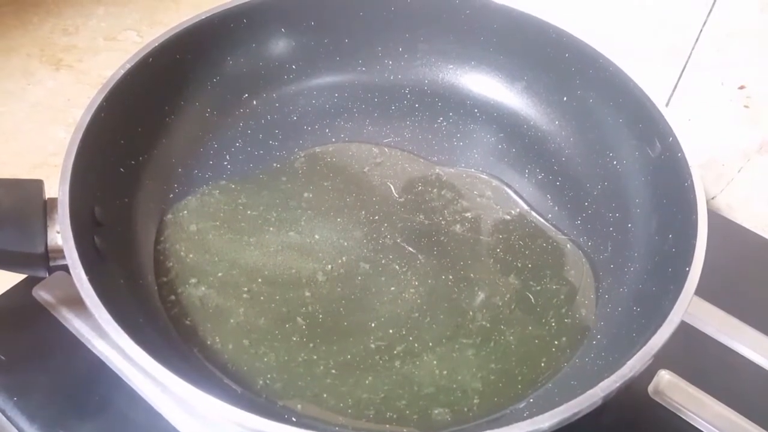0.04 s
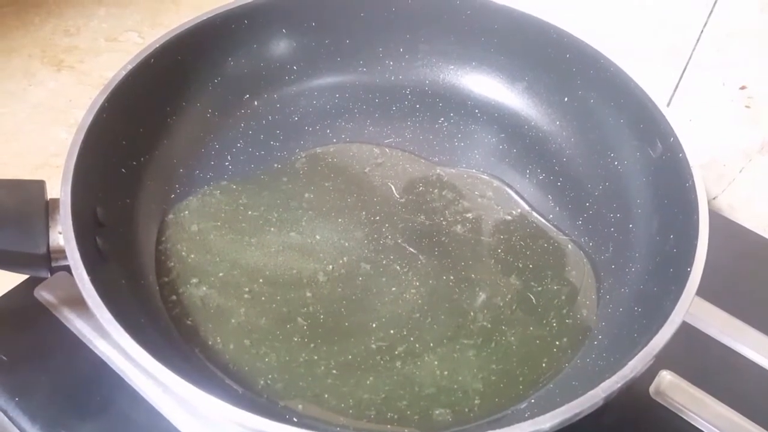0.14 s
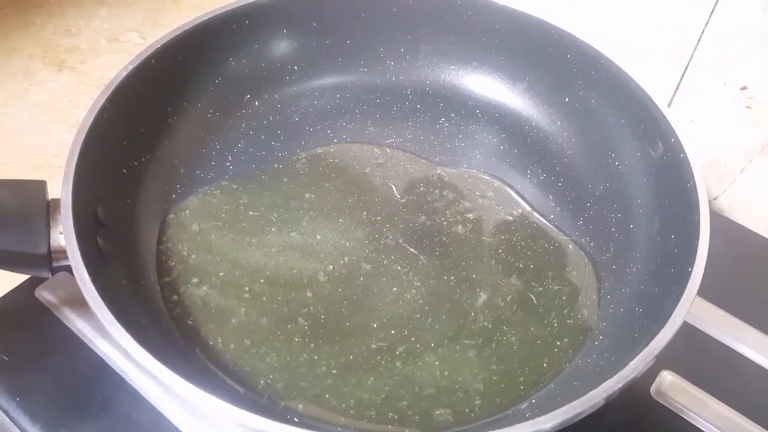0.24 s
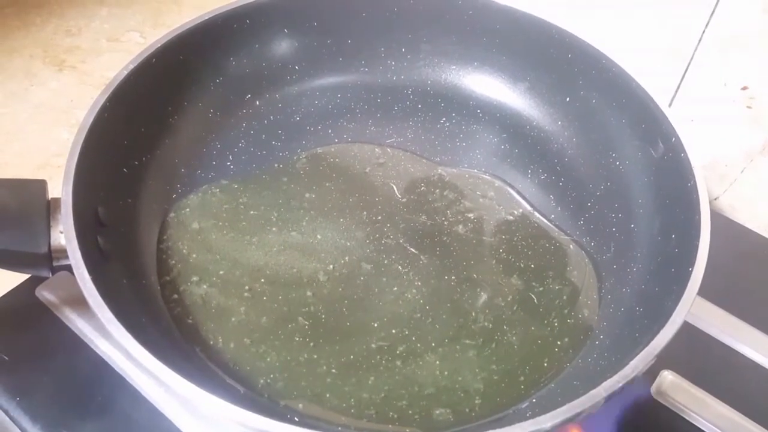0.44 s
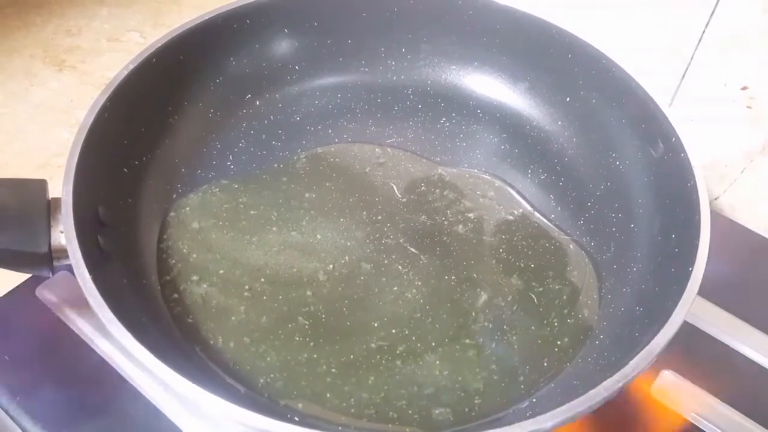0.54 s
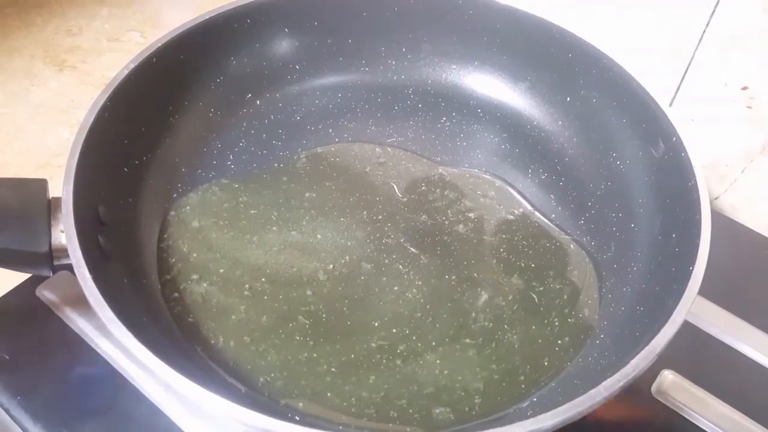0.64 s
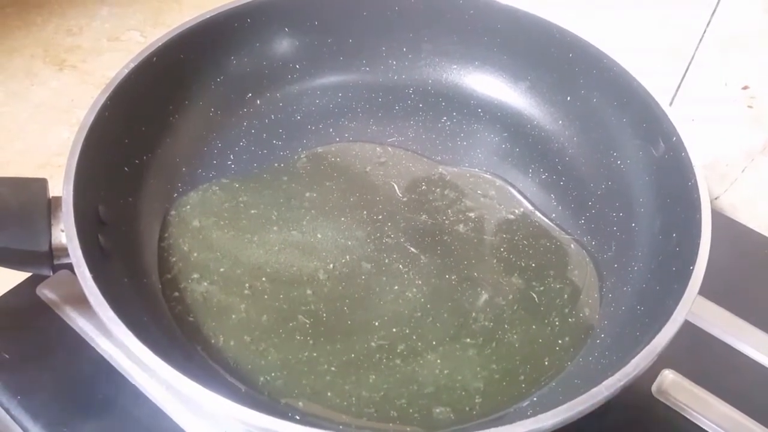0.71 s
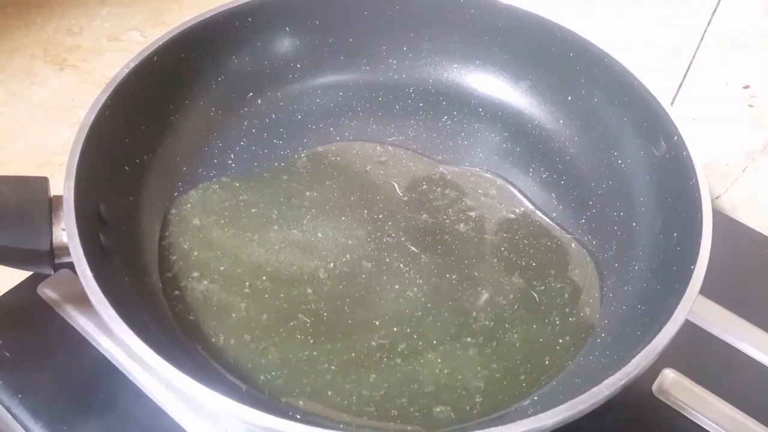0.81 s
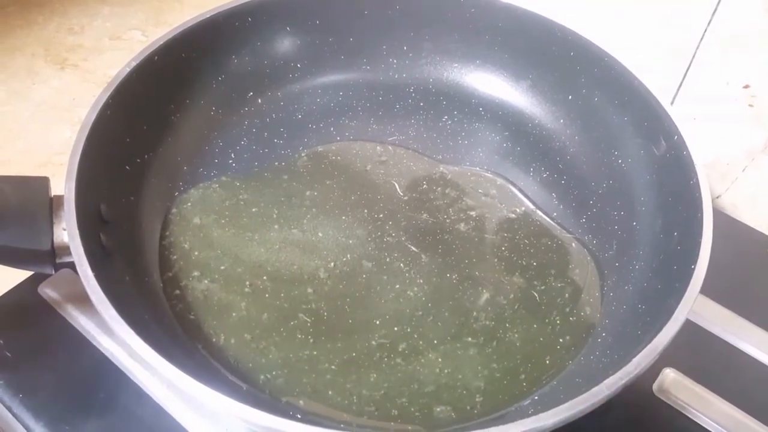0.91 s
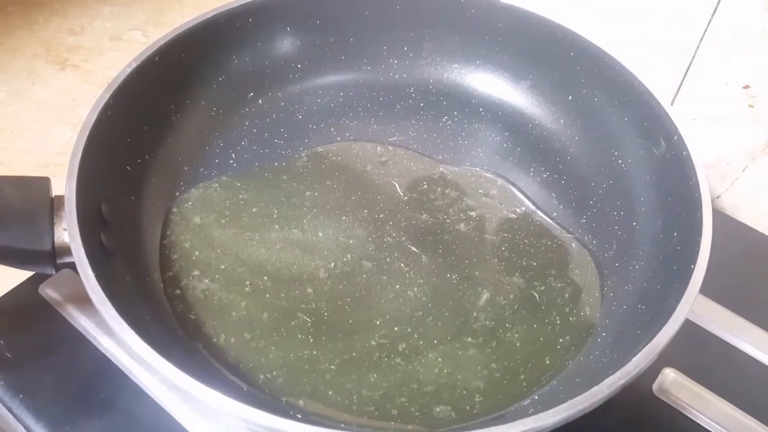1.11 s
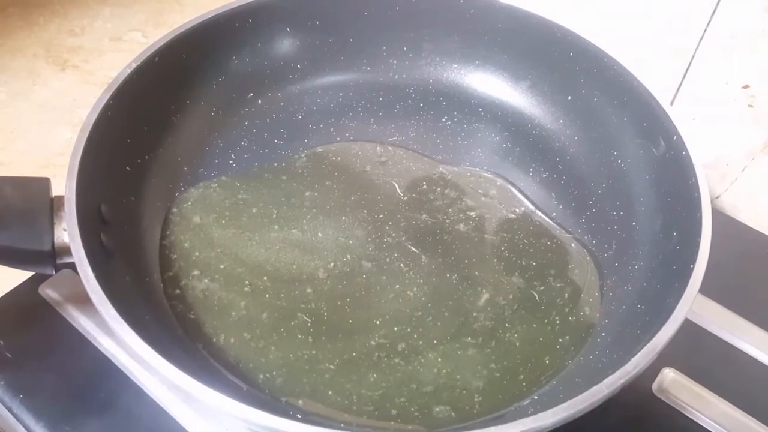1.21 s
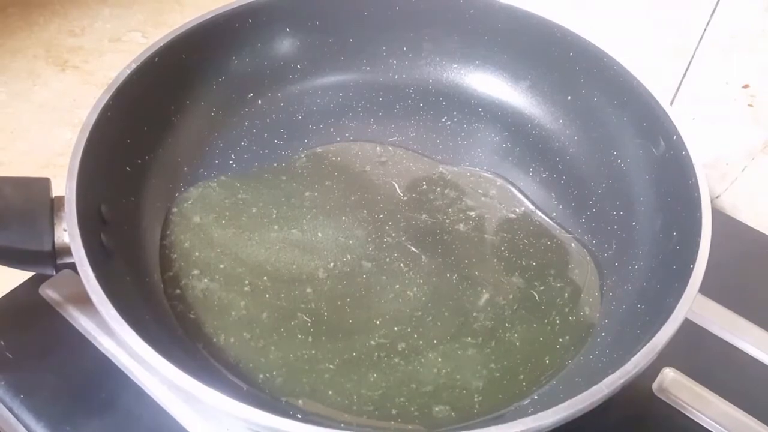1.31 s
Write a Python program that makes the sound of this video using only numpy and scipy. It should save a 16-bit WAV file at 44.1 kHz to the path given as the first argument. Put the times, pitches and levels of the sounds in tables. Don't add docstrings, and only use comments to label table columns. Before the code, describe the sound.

One loud metallic igniter click on a gas hob, followed by low fluttering whumps of flame.

```python
import sys
import numpy as np
from scipy import signal
from scipy.io import wavfile
from scipy.ndimage import uniform_filter1d

SR = 44100
rng = np.random.default_rng(int(sys.argv[2]) if len(sys.argv) > 2 else 0)


def transcribe(u):
    v = np.clip(np.atleast_2d(u).T, -1, 1)
    q = np.round(v * 32767).astype(np.int16)
    wavfile.write(sys.argv[1], SR, q)


def invert_db(level):
    return 10 ** (np.asarray(level, dtype=float) / 20)


N = 59535
TIME = np.arange(N) / SR
SNAP_S = 0.521
EARS = np.array([[1], [-1]])


def evened(x):
    return x / np.sqrt(np.mean(x ** 2) + 1e-20)


def read(points, hz):
    f, value = np.transpose(points)
    return np.interp(np.log(hz + 1), np.log(f + 1), value)


def curve(points):
    s, db = np.transpose(points)
    return invert_db(np.interp(TIME, s, db, left=db[0], right=db[-1]))


def resonate(x, hz, width):
    turn = np.exp(2j * np.pi * hz * np.arange(x.shape[-1]) / SR)
    r = np.exp(-np.pi * width / SR)
    low = signal.lfilter([1 - r], [1, -r], x / turn)
    low = signal.lfilter([1 - r], [1, -r], low)
    return 2 * (turn * low).real


def noise(colour, extra_db=lambda hz, t: 0, patchy_db=0.):
    # pitch in Hz, likeness of left and right (1 is equal, below 0 is opposed).
    likeness = [(60, 1), (180, 0.75), (540, 0.53), (1610, -0.22), (4810, 0.088), (14400, -0.34)]
    frames = N // 128 + 5
    hz = np.fft.rfftfreq(512, 1 / SR)[:, None]
    a, b, c, d, patches = rng.standard_normal((frames, 257, 5)).T
    patches = uniform_filter1d(patches, size=6, axis=0)
    patches = evened(uniform_filter1d(patches, size=24, axis=1))
    same = np.clip(read(likeness, hz), -1, 1)
    left = a + 1j * b
    right = same * left + np.sqrt(1 - same ** 2) * (c + 1j * d)
    z = np.array([left, right]) * invert_db(read(colour, hz) + patchy_db * patches)
    scale = np.sqrt(np.mean(signal.istft(z, nperseg=512, noverlap=384)[1] ** 2))
    z = z * invert_db(extra_db(hz, np.arange(frames) * 128 / SR))
    return signal.istft(z, nperseg=512, noverlap=384)[1][:, :N] / scale


def kitchen():
    # pitch in Hz, level in dB per Hz.
    rumble_colour = [(20, -22), (50, 6.5), (100, 3), (300, -6.5), (420, -9.5), (560, -22.5), (1200, -22.5),
                     (2000, -48)]
    # pitch in Hz, level in dB per Hz.
    air_colour = [(200, -24), (500, -1.5), (1100, -6), (2000, -7), (4300, -11.5), (7000, -10.5),
                  (8400, -19.5), (9100, -32.5)]
    # pitch in Hz, width in Hz, level in dB.
    duct = [(960, 85, -63.5), (1830, 140, -67.5), (2184, 74, -68), (2685, 51, -69), (1247, 58, -72.5),
            (9390, 440, -75.5)]
    # pitch in Hz, width in Hz, level in dB.
    jet_tones = [(6090, 670, -50.5), (11580, 430, -69), (3235, 93, -63), (10630, 240, -72.5)]
    # time in seconds, level in dB.
    jet_level = [(0, 0.5), (.25, 0.5), (.515, 0), (.53, -15), (.82, -2.5), (.86, -7), (.91, -2.5), (1.0, -6),
                 (1.1, -5.5), (1.16, -1), (1.35, -1)]
    # time in seconds, gain in dB.
    camera_gain = [
        (0, 8),
        (.15, 4.5),
        (.27, 7.5),
        (.515, 7.5),
        (.53, 13),
        (.85, 0.5),
        (1.05, -2),
        (1.17, 0.5),
        (1.35, 2),
    ]
    rumble_db, air_db, swell_db, patchy_db = -39.5, -52, 1., .7
    rumble_follows = .3
    swell = uniform_filter1d(rng.standard_normal(N), size=2000)
    swell = evened(uniform_filter1d(swell, size=2000))
    white = rng.standard_normal((2, N))
    gain = curve(camera_gain)
    hiss = sum(invert_db(db) * evened(resonate(white, hz, width)) for hz, width, db in jet_tones)
    hiss = hiss * invert_db(swell_db * (swell - swell.mean()))
    air = invert_db(air_db) * noise(air_colour, patchy_db=patchy_db)
    air = air + sum(invert_db(db) * evened(resonate(white, hz, width)) for hz, width, db in duct)
    rumble = invert_db(rumble_db) * noise(rumble_colour)
    return gain ** rumble_follows * rumble + gain * air + curve(jet_level) * hiss


def flame():
    # centre in seconds, length in seconds, level in dB, pitch in Hz.
    puffs = [(.245, 0.098, -27.5, 57), (0.27, 0.071, -27.5, 106.2), (0.45, 0.045, -33, 130),
             (.365, 0.034, -30.5, 65), (0.431, 0.036, -22, 126), (.47, 0.091, -32, 282),
             (0.488, 0.054, -26, 95), (.607, 0.029, -13, 92), (0.671, 0.035, -18.5, 83),
             (.615, 0.04, -24, 215), (.636, 0.04, -23.5, 100), (0.721, 0.045, -27, 99),
             (.699, 0.04, -22, 99), (.741, 0.032, -26, 99), (.688, 0.019, -21.5, 100),
             (0.108, 0.066, -38, 57), (0.365, 0.044, -32, 133), (.29, 0.043, -41, 400),
             (.4, 0.052, -41.5, 420), (.78, 0.056, -39.5, 307), (.88, 0.035, -40, 170),
             (1.2, 0.071, -35.5, 94.4), (.69, 0.032, -30.5, 322), (.61, 0.026, -24.5, 50),
             (.598, 0.0124, -21.5, 140), (.55, .05, -29, 70), (0.99, 0.048, -37, 110),
             (1.08, 0.072, -41, 230), (0.85, .05, -40, 210), (.21, 0.051, -41, 400),
             (0.466, 0.061, -43, 544), (.59, 0.065, -28, 365), (.64, 0.042, -31, 340),
             (0.348, 0.032, -28.5, 153.6), (0.35, 0.055, -40.5, 273), (.7, 0.027, -32, 228),
             (1, 0.037, -41, 99), (.98, 0.091, -38.5, 186), (1.18, 0.053, -44.5, 303),
             (0.8, 0.091, -40, 110), (0.58, .04, -32, 88), (0.0103, 0.034, -29, 67),
             (0.12, 0.078, -36, 109), (1.3, 0.15, -40, 300), (1.28, 0.096, -39.5, 205)]
    # pitch in Hz, width in Hz, level in dB.
    roar_lumps = [(63.3, 20, -2), (98.9, 25, 2.5), (169.1, 35, -4), (284.3, 30.4, -4.5), (387.5, 27, -9)]
    # time in seconds, level of the roar in dB.
    roar_strength = [
        (0, -41),
        (.15, -42),
        (.3, -37),
        (.5, -31),
        (.53, -40),
        (.58, -24.5),
        (.74, -35.5),
        (.8, -44.5),
        (1.35, -41),
    ]
    ear_lag_s = 0.00011
    spread_per_hz = 0.0006
    out = np.zeros((2, N))
    for s, length, db, hz in puffs:
        swing = np.cos(2 * np.pi * hz * (TIME - s + ear_lag_s * EARS))
        out += invert_db(db) * np.exp(-(2 * (TIME - s) / length) ** 2) * swing
    shared, differing = rng.standard_normal((2, N))
    roar = 0
    for hz, width, db in roar_lumps:
        source = shared + spread_per_hz * hz * EARS * differing
        roar = roar + invert_db(db) * evened(resonate(source, hz, width))
    return out + curve(roar_strength) * evened(roar)


def ringing():
    # time in seconds, level in dB.
    strength = [
        (.5165, -35),
        (.5198, -19.5),
        (.521, -19.5),
        (.532, -24.5),
        (.538, -19.5),
        (.595, -23),
        (.62, -30),
        (.705, -37.5),
        (.755, -50.5),
    ]
    # pitch in Hz, level in dB per Hz.
    tail_colour = [(240, -13), (400, -4.5), (1040, -5), (2700, -7), (7400, -9), (9800, -30), (11500, -20),
                   (14600, -33.5)]
    # pitch in Hz, level in dB, time to fade by 20 dB in seconds.
    metal_tones = [(617, -0.5, .4), (737, -7.5, 0.18), (880, -5.5, .26), (1031, -3, 0.26),
                   (1297, -4.5, 0.14), (1400, -4, 0.091), (1822, -5, .6), (2012, -0.5, 0.4),
                   (2280, 2.5, 0.62), (2737, 4, 0.17), (3877, 0, 0.18), (4836, 1.5, .5), (5195, 3.5, 0.33),
                   (7014, 2.5, 0.4)]
    top_hz, top_fade_db_per_s, right_top_db = 9200, -81, 16
    metal_width_hz, metal_db = 22, -4
    end_db_per_s, patchy_db = -220, 2.4

    def top_change(hz, t):
        pan_db = right_top_db * np.array([-.5, .5])[:, None, None]
        return (hz > top_hz) * (top_fade_db_per_s * (t - SNAP_S).clip(0) + pan_db)

    white = rng.standard_normal((2, N))
    age = (TIME - SNAP_S).clip(0)
    metal = 0
    for hz, db, t60 in metal_tones:
        metal = metal + invert_db(db - 20 * age / t60) * resonate(white, hz, metal_width_hz)
    metal = metal / np.sqrt(np.mean(metal[:, :N // 3] ** 2))
    tail = noise(tail_colour, top_change, patchy_db) + invert_db(metal_db) * metal
    started = TIME > strength[0][0]
    ending = invert_db(end_db_per_s * (TIME - strength[-1][0]).clip(0))
    return started * curve(strength) * ending * tail


def igniter():
    # start in seconds, level in dB, left over right in dB, pitch in Hz,
    # time to fade by 60 dB in seconds.
    blows = [(0.5201, -1, 14, 5650, 0.0054), (.5203, -5, -11, 3050, 0.0048),
             (0.5212, -9.5, -19, 7090, 0.0078), (.5219, -18, 2, 2070, 0.0036),
             (.5220, -14, 4, 5860, 0.0049), (0.524, -7, -15, 7270, 0.0094), (.5235, -14, -4, 4860, 0.0076),
             (0.5248, -7.5, 9, 5200, .007), (0.5239, -13, -8, 7000, 0.0064),
             (.5268, -9.5, 11, 1310, 0.0077), (0.5265, -7, -13, 4030, 0.0045), (0.5287, -14, -4, 5440, .01),
             (0.529, -10, -4, 6370, 0.0087), (.5306, -11, 10, 7400, 0.016),
             (.5312, -14.5, -9, 1510, 0.0036), (.5317, -7.5, -5, 4785, 0.019),
             (.5328, -11, 6, 5100, 0.0085), (.5372, -14.5, 7, 925, 0.013), (.5405, -8.5, 11, 1100, .012),
             (0.541, -11, -5, 1500, 0.0092)]
    # pitch in Hz, level in dB per Hz.
    snap_colour = [(400, -18), (750, -18), (1050, 1), (1500, -3), (2000, 5), (3500, -1), (7200, 4.5),
                   (9500, -18)]
    # pitch in Hz, width in Hz, level in dB.
    spring_whistle = (13050, 3000, -21)
    rise_s, blow_width_hz, ping_db = 0.00035, 4000, 7.5
    tick_db, tick_t60_s = -2.5, 0.015
    clamp_s, clamp_db = .534, -6
    out = np.zeros((2, N))
    whistle_hz, whistle_width, whistle_db = spring_whistle
    whistle = evened(resonate(rng.standard_normal((2, N)), whistle_hz, whistle_width))
    bright = noise(snap_colour) + invert_db(whistle_db) * whistle
    white = rng.standard_normal((2, N))
    for s, db, pan_db, hz, t60 in blows:
        age = np.maximum(TIME - s, 0)
        ping = invert_db(ping_db - 60 * age / t60) * np.sin(2 * np.pi * hz * age)
        grit = .5 * evened(resonate(white, hz, blow_width_hz)) + bright
        tick = invert_db(tick_db - 60 * age / tick_t60_s) * grit
        rise = 1 - np.exp(-age / rise_s)
        out += invert_db(db - 9 + pan_db * EARS / 2) * rise * (ping + tick)
    return out * invert_db(clamp_db * np.clip((TIME - clamp_s) * 1000, 0, 1))


def knock():
    # pitch in Hz, level in dB, time to fade by 60 dB in seconds.
    casing_tones = [(250.2, -9.5, 0.1), (585, -25, 0.13), (357.4, -26, 0.3), (890, -31.5, 0.078),
                    (1100, -26, 0.19), (2010, -25.5, 0.13), (733.6, -33.5, 0.54), (608, -32, 0.53),
                    (1023, -32.5, 0.54), (223, -22, 0.36), (1280, -30.5, 0.065)]
    rise_s = 0.0045
    age = (TIME - SNAP_S).clip(0)
    tones = sum(invert_db(db - 60 * age / t60) * np.sin(2 * np.pi * hz * age) for hz, db, t60 in casing_tones)
    return (1 - np.exp(-age / rise_s)) * tones


def scene():
    left_db, duck_db, duck_s = 0.5, -15, 0.029
    lean = invert_db(left_db * EARS / 2)
    t = TIME - SNAP_S
    onset = np.clip(t * 200 + 1, 0, 1)
    duck = invert_db(duck_db * onset * np.exp(-(t.clip(0) / duck_s) ** 2))
    return igniter() + lean * (ringing() + knock()) + duck * (flame() + kitchen())


def thinned_top(x):
    lowest_hz, limit_db, scatter_db = 8800, -15.5, 4
    floor_db = -68
    hz, _, z = signal.stft(x, SR, nperseg=1024, noverlap=768)
    power = uniform_filter1d(abs(z) ** 2, size=7, axis=1)
    power = uniform_filter1d(power, size=5, axis=2)
    treble = power[:, (hz > 2000) & (hz < 8000)].mean(axis=(0, 1))
    blocks = rng.standard_normal((1, 65, z.shape[2] // 6 + 1))
    blocks = np.repeat(np.repeat(blocks, 8, axis=1), 6, axis=2)[:, :513, :z.shape[2]]
    ratio = abs(power / np.maximum(treble, invert_db(2 * floor_db)))
    keep = np.clip(10 * np.log10(ratio + 1e-20) - limit_db - scatter_db * blocks, 0, 1)
    keep = np.maximum(keep, (hz < lowest_hz)[:, None])
    return signal.istft(z * keep, SR, nperseg=1024, noverlap=768)[1][:, :N]


def roll_off(x):
    return signal.sosfilt(signal.butter(12, 14980, fs=SR, output="sos"), x)


def record(dry):
    edge_hz, bass_cut_hz = 14900, 40
    x = 0.96 * np.tanh(dry)
    lowpass = signal.firwin(255, edge_hz, window=("kaiser", 9), fs=SR)
    x = thinned_top(signal.oaconvolve(x, lowpass[None], "same"))
    x = signal.sosfilt(signal.butter(3, bass_cut_hz, "high", fs=SR, output="sos"), x)
    return roll_off(x)


dry = scene()
out = record(dry)
transcribe(out)
```